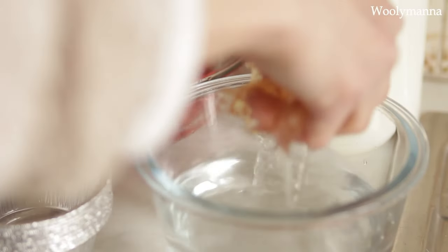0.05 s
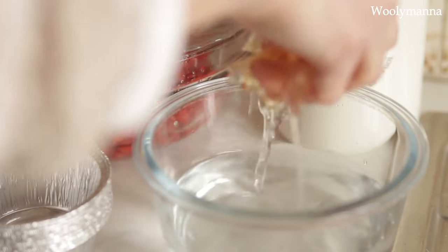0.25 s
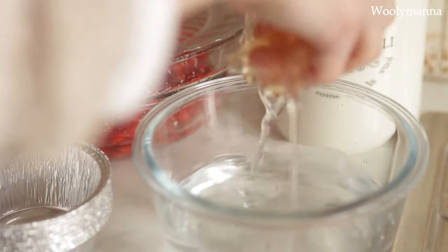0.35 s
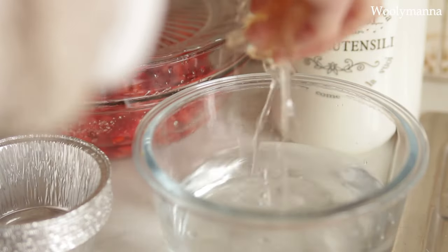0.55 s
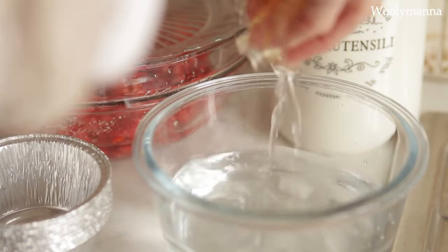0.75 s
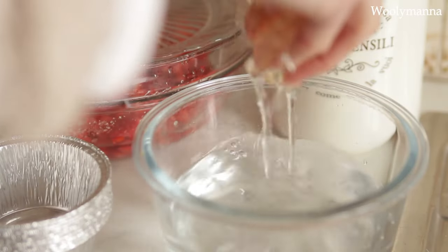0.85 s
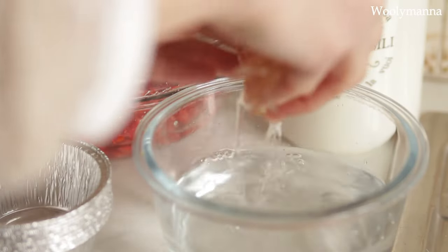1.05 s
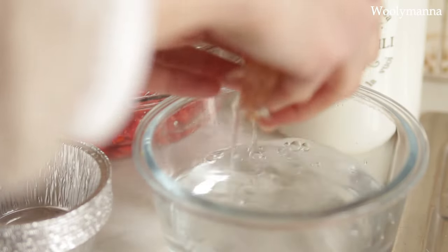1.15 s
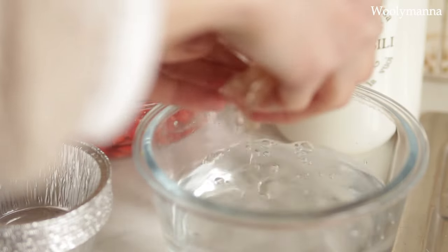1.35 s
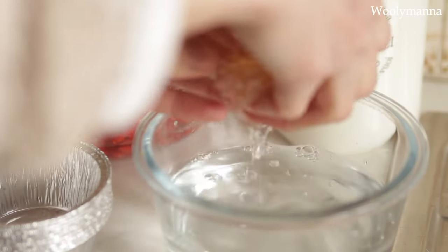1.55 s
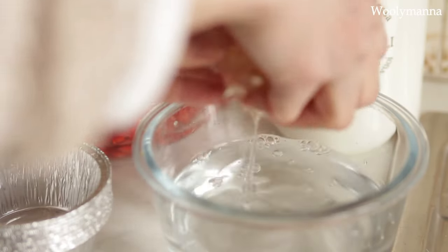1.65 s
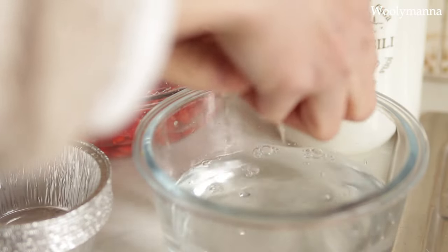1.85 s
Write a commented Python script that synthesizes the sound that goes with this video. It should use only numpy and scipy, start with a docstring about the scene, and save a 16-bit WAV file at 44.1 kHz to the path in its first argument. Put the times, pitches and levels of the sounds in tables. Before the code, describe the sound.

Water trickles from a squeezed, soaked lump into a glass bowl of water. The trickle swells with bubbly plinks, then thins to single drips, heard close in a quiet kitchen with a short echo.

```python
"""Water squeezed from a soaked lump trickles into a glass bowl of water in a quiet, hard-walled kitchen.
Drops slap the surface and trap air bubbles that ring with a rising pitch; heavy ones set the bowl singing,
and the room draws each plink out. The trickle swells, then thins to single drips.
A low rumble and a faint hiss lie underneath."""
import sys
import numpy as np
from scipy import signal
from scipy.fft import rfft, irfft
from scipy.io import wavfile

SR = 44100
rng = np.random.default_rng(int(sys.argv[2]) if len(sys.argv) > 2 else 0)


def store_wav(level_fs):
    """Save 16-bit WAV to argv[1]."""
    pcm = np.round(np.clip(np.atleast_2d(level_fs), -1, 1) * 32767)
    wavfile.write(sys.argv[1], SR, pcm.T.astype(np.int16))


N = 83790

BUBBLE_ATTACK_S = 0.0004
SCATTER_DB, PAN_DB = 8, 2  # tiny bubbles and droplets: largest random boost and left-right difference


def amp(db):
    """Turn decibels into a gain to multiply by."""
    return 10 ** (np.asarray(db) / 20)


def unit(x):
    """Scale a signal to an average (rms) level of 1."""
    return x / np.sqrt(np.mean(x ** 2) + 1e-20)


def read(points, hz):
    """Look up a table between its rows, on a scale of octaves."""
    f, value = np.transpose(points)
    return np.interp(np.log(hz + 1), np.log(f + 1), value)


def add(mix, s, sound, pan_db=0):
    """Mix a sound in at s seconds, pan_db louder on the left than on the right."""
    part = mix[:, max(round(s * SR), 0):][:, :sound.shape[-1]]
    part += amp([[pan_db / 2], [-pan_db / 2]]) * sound[..., :part.shape[1]]


def diffuse(pair, colour):
    """Shape the tone of two unrelated signals and make them partly alike, as sound from all around is."""
    # How alike left and right are: (frequency [Hz], likeness [0-1])
    likeness = [(30, .5), (150, .85), (400, .85), (1000, .68), (2300, .7), (5000, .3), (14000, .05)]
    spectra = rfft(pair)
    hz = np.linspace(0, SR / 2, spectra.shape[1])
    same = read(likeness, hz)
    mid = spectra[0] * np.sqrt((1 + same) / 2)
    side = spectra[1] * np.sqrt((1 - same) / 2)
    return irfft(np.array([mid + side, mid - side]) * amp(read(colour, hz)), pair.shape[1])


def room_noise():
    """A low, wavering rumble, lifted where the room resonates, with a faint even hiss."""
    # Tone of the rumble: (frequency [Hz], relative level [dB])
    rumble_colour = [(15, -70), (25, -27), (70, -17), (98, -10), (289, -0.5), (343, -5), (431, -5.5),
                     (615, -17), (750, -21), (980, -22), (1650, -120)]
    # Wavering of the rumble: (time [s], relative level [dB])
    rumble_level = [(0, 4), (0.251, 2.5), (.5, -1), (.61, 7.5), (.72, 0), (.96, 5.5), (1.12, 1.5),
                    (1.32, -0.5), (1.44, 3), (1.56, -4), (1.71, -4), (1.79, 1.5)]
    # Low resonances of the kitchen: (frequency [Hz], lift [dB])
    resonances = [(152, 6), (241, 9), (299, 3.5), (369, 5.5), (428, 9.5)]
    # Tone of the hiss: (frequency [Hz], relative level [dB])
    hiss_colour = [(350, -7), (600, -3), (1010, -12), (1280, -3), (1550, -6), (6920, -11.5), (13800, -17),
                   (16000, -21)]
    rumble_db, hiss_db, half_width_hz = -50.5, -60.5, 1.87
    hz = np.fft.rfftfreq(N, 1 / SR)
    lift_db = sum(lift / (1 + ((hz - f) / half_width_hz) ** 2) for f, lift in resonances)
    rumble = diffuse(rng.standard_normal((2, N)), rumble_colour)
    rumble = irfft(rfft(rumble) * amp(lift_db), N)
    rumble *= amp(np.interp(np.arange(N) / SR, *np.transpose(rumble_level)))
    hiss = diffuse(rng.standard_normal((2, N)), hiss_colour)
    return amp(rumble_db) * unit(rumble) + amp(hiss_db) * unit(hiss)


def slap(db, hz, decay):
    """Water hits water in a short burst of noise; the brighter it is, the more left and right differ."""
    half_width_octaves, top_hz, apart_hz = 0.55, 14200, 12000
    t = np.arange(1024) / SR
    edges = np.clip(hz * 2 ** (half_width_octaves * np.array([-1, 1])), 100, [0.8 * top_hz, top_hz])
    noise = rng.standard_normal((2, len(t))) * np.exp(-t / decay)
    mid, side = signal.lfilter(*signal.butter(2, edges, "bandpass", fs=SR), noise)
    burst = unit(mid) + np.outer([1, -1], unit(side)) * min((hz / apart_hz) ** 2, 1)
    return amp(db) * burst / np.linalg.norm(burst) * np.sqrt(decay * SR) / 2


def spray():
    """Fine droplets tick on the surface and in the wet lump."""
    # Strength of the spray: (time [s], relative level [dB])
    spray_level = [(0, -9.5), (.15, -7.5), (.25, -2), (.55, -3), (.95, -2), (1.1, -5), (1.3, -4.5),
                   (1.42, -2), (1.55, -38)]
    ticks_per_s, centres_hz = 420, 4570 * 2 ** np.linspace(-0.5, 0.8, 24)
    ticks = [slap(db=-53, hz=hz, decay=0.0015) for hz in centres_hz]
    out = np.zeros((2, N))
    for when, pick, loud, pan in rng.random((int(ticks_per_s * N / SR), 4)):
        s = when * N / SR
        db = np.interp(s, *np.transpose(spray_level)) + SCATTER_DB * loud
        add(out, s, amp(db) * ticks[int(pick * len(ticks))], PAN_DB * (2 * pan - 1))
    return out


def bubble(hz, db, life, rise):
    """A fading ring that rises in pitch, as an air bubble's does when it nears the surface."""
    t = np.arange(0, 5 * life, 1 / SR)
    pitch = hz * (1 + rise * np.minimum(t / life, 2))
    envelope = (1 - np.exp(-t / BUBBLE_ATTACK_S)) * np.exp(-(t / life) ** 1.3)
    return amp(db) * envelope * np.sin(2 * np.pi * np.cumsum(pitch) / SR)


def trickle():
    """The thin stream sheds small bubbles at random, louder the more strongly it flows."""
    # Strength of the trickle: (time [s], relative level [dB])
    flow = [(0, -53), (.17, -16), (.3, -3), (.45, -4), (.68, -0.5), (.98, -1), (1.12, -5), (1.22, -7.5),
            (1.36, -24), (1.9, -42)]
    bubbles_per_s, low_hz, high_hz, life_cycles = 380, 1040, 8100, 6
    base_db, db_per_octave = -43.5, -4
    out = np.zeros((2, N))
    for when, height, loud, pan in rng.random((int(bubbles_per_s * N / SR), 4)):
        s = when * N / SR
        hz = low_hz * (high_hz / low_hz) ** height
        db = base_db + np.interp(s, *np.transpose(flow)) + SCATTER_DB * loud
        db += db_per_octave * np.log2(hz / low_hz)
        add(out, s, bubble(hz, db, life_cycles / hz, rise=0.02), PAN_DB * (2 * pan - 1))
    return out


def drips():
    """The drops that stand out, with the rings and plops they set off."""
    # Trapped bubbles, and one faint, long ring near 1050 Hz, probably from the bowl:
    # (time [s], starting pitch [Hz], level [dB], life [s], pitch rise [share per life])
    rings = [(0.098, 8060, -35, 0.0028, 0.045), (0.105, 2840, -43, 0.0027, 0.053),
             (.184, 1365, -45.5, 0.01, 0.0097), (.2235, 2266, -33.5, .004, 0.036),
             (0.221, 1247, -32.5, 0.026, 0.011), (0.249, 5250, -34.5, 0.0023, 0.077),
             (.4125, 2015, -32.5, 0.0042, 0.072), (0.416, 1683, -35, 0.0094, 0.01),
             (0.42, 2924, -42.5, 0.0077, 0.054), (.475, 2290, -29, 0.0014, 0.029),
             (0.475, 1173, -37.5, 0.011, 0.011), (.490, 2730, -34.5, 0.0021, 0.086),
             (0.52, 3790, -35, 0.003, 0.046), (.53, 1050, -56, 0.17, 0.008),
             (0.6264, 2380, -23.5, 0.0041, 0.038), (0.629, 1358, -31, 0.02, 0.03),
             (.683, 4030, -39.5, 0.0045, 0.022), (.685, 5640, -32.5, 0.0016, 0.12),
             (.712, 1800, -34, 0.0084, 0.063), (0.7589, 1520, -27, 0.0088, 0.16),
             (.833, 1082, -34, 0.029, 0.02), (0.869, 4620, -44.5, 0.01, 0.038),
             (.901, 2000, -22, 0.0017, 0.12), (.902, 963, -27.5, 0.01, 0.02),
             (0.9309, 2316, -21, 0.0026, 0.16), (.935, 2894, -27, 0.0042, 0.12),
             (.945, 6560, -23, 0.0023, 0.023), (.940, 1045, -36.5, 0.04, 0.008),
             (0.956, 1280, -36, 0.014, 0.03), (0.96, 1440, -34.5, 0.01, 0.017),
             (1.083, 1492, -25, 0.0044, 0.039), (1.162, 2620, -34, 0.0022, 0.067),
             (1.166, 1430, -37, 0.0091, 0.028), (1.569, 3580, -58, 0.02, 0.0023),
             (1.723, 3229, -39.5, 0.0084, 0.01), (1.7225, 3560, -43.5, 0.021, 0.012)]
    # Bubbles that burst at the surface while still ringing:
    # (time [s], starting pitch [Hz], final pitch [Hz], level [dB], life [s], swell over the life [dB])
    plops = [(.2148, 2060, 2300, -23, 0.0057, 9), (0.2265, 4220, 5010, -29, 0.0031, 1),
             (0.5138, 3370, 3884, -30, 0.0048, 1.5), (0.603, 5300, 6590, -31.5, 0.0033, 2),
             (0.6054, 7000, 8300, -30, 0.0038, 5), (0.7409, 7700, 11700, -26, 0.00069, -4),
             (0.7638, 1866, 2390, -20.5, .0055, 2), (0.8591, 8150, 10600, -31, 0.00077, -3),
             (1.3389, 1338, 1417, -32, 0.015, -4.5)]
    # Slaps on the water and wet clicks of the lump: (time [s], level [dB], centre [Hz], decay [s])
    slaps = [(0.0997, -34, 8400, 0.0017), (0.183, -41, 1980, 0.0021), (0.2276, -32, 5030, 0.0023),
             (0.4139, -36.5, 3900, 0.00079), (0.417, -41, 7200, 0.0035), (0.5109, -29.5, 6570, 0.0047),
             (0.513, -23.5, 9300, 0.00063), (0.605, -33.5, 7500, .003), (0.625, -26, 2550, 0.0031),
             (0.7578, -19, 2270, 0.00025), (0.8314, -40, 2470, 0.0011), (0.902, -28, 9100, 0.00095),
             (0.9319, -25.5, 3760, 0.0011), (0.9573, -35, 3550, 0.0025), (1.051, -37, 11600, 0.00045),
             (1.082, -28, 1920, 0.00093), (1.1624, -26.5, 4070, 0.0043), (1.1611, -27, 10200, 0.00025),
             (1.254, -42, 13000, 0.0043), (1.300, -39, 5300, .002), (1.338, -26, 2180, 0.00039),
             (1.569, -41, 7400, 0.0028), (1.722, -32.5, 3950, 0.00094)]
    out = np.zeros((2, N))
    for sound, events in (bubble, rings), (plop, plops), (slap, slaps):
        for s, *settings in events:
            add(out, s, sound(*settings))
    return out


def bowl():
    """Each heavy drop adds energy to the tones of the glass, which sing on between the drips."""
    # Tones of the filled bowl: (pitch [Hz], relative level [dB], time to fade by 60 dB [s])
    tones = [(1266, 1.5, 0.88), (1385, -18, 0.97), (2131, -12.5, 0.44), (2390, -18, 0.52)]
    # Drops heavy enough to set the bowl ringing: (time [s], level [dB])
    knocks = [(.184, -47.5), (0.22, -33), (0.63, -38.5), (.683, -39.5), (0.933, -39), (1.339, -48.5)]
    rise_s = 0.004
    t, out = np.arange(N) / SR, np.zeros((2, N))
    for (hz, tone_db, fade_s), phase in zip(tones, rng.random(len(tones))):
        energy = 0
        for s, db in knocks:
            age = np.maximum(t - s, 0)
            ring = amp(db + tone_db - 60 * age / fade_s) * (1 - np.exp(-age / rise_s))
            energy += ring ** 2
        out += np.sqrt(energy) * np.sin(2 * np.pi * (hz * t + phase))
    return out


def plop(hz, end_hz, db, life, swell_db):
    """A bubble glides up in pitch and stops short as it bursts."""
    burst_s = 0.00047
    t = np.arange(0, life + burst_s, 1 / SR)
    pitch = hz + (end_hz - hz) * t / life
    gain = amp(db + swell_db * t / life - max(swell_db, 0))
    envelope = (1 - np.exp(-t / BUBBLE_ATTACK_S)) * np.clip((life - t) / burst_s + 0.5, 0, 1)
    return gain * envelope * np.sin(2 * np.pi * np.cumsum(pitch) / SR)


def kitchen(x):
    """A few quick echoes from bowl and worktop, then a long wash of echoes from all around."""
    # How long the room rings: (frequency [Hz], time to fade by 60 dB [s])
    fade_times = [(300, 0.68), (1300, 0.5354), (3500, 0.4438), (7000, 0.3959), (14000, 0.5446)]
    # Tone of the echoes: (frequency [Hz], gain [dB])
    echo_colour = [(300, 4.5), (1300, 0), (2500, -1.5), (3800, 4.5), (7000, 0.5), (10000, -1), (14000, -13)]
    tail_db, build_up_s = -1.5, 0.017
    early_db, early_s, count = -4, 0.018, 8
    hz, when, spectra = signal.stft(rng.standard_normal((2, SR)), SR, nperseg=256)
    fade = amp(-60 * when / read(fade_times, hz)[:, None])
    tail = signal.istft(spectra * fade, SR, nperseg=256)[1][:, :SR]
    tail *= 1 - np.exp(-np.arange(SR) / SR / build_up_s)
    tail *= amp(tail_db) / np.linalg.norm(tail[0])
    early_delays = (rng.uniform(0.0982, 1, (2, count)) * early_s * SR).astype(int)
    for channel, delays, signs in zip(tail, early_delays, rng.choice([-1, 1], (2, count))):
        channel[delays] += signs * amp(early_db) / np.sqrt(count)
    return signal.fftconvolve(x, diffuse(tail, echo_colour), axes=1)[:, :N]


def scene():
    """Water and bowl, heard directly and through the room, over the room's own noise."""
    background = room_noise()
    water = drips() + trickle() + spray()
    glass = bowl()
    return background + water + glass + kitchen(water + amp(-10.5) * glass)


def record(dry):
    """Cut away the very highest treble."""
    low_pass = signal.firwin(511, cutoff=16100, window=("kaiser", 9), fs=SR)
    return signal.oaconvolve(dry, low_pass[None], "same")


dry = scene()
out = record(dry)
store_wav(out)
```